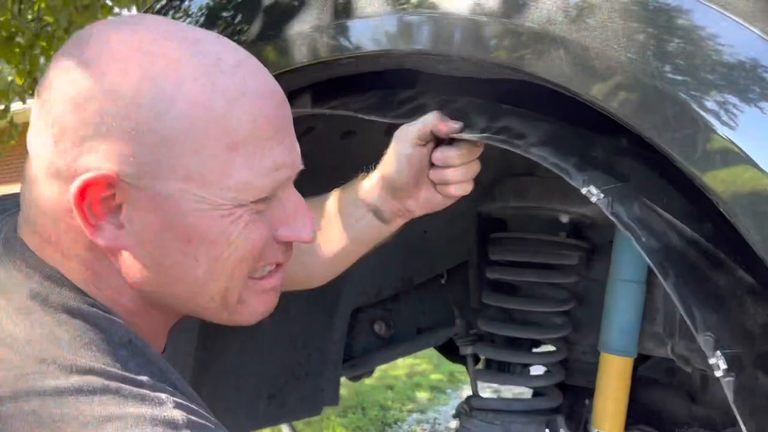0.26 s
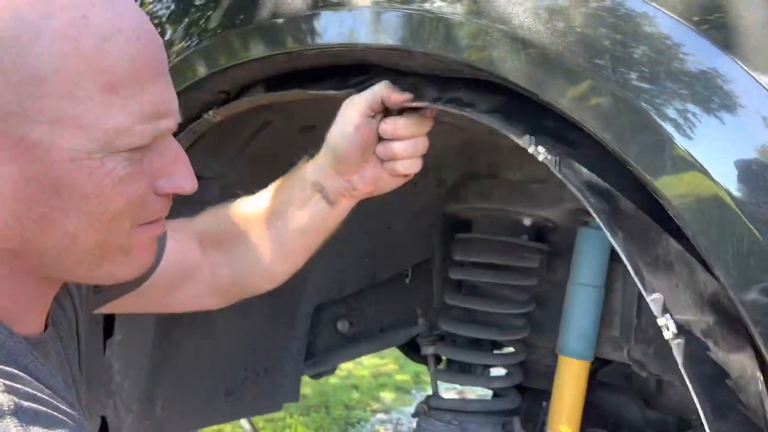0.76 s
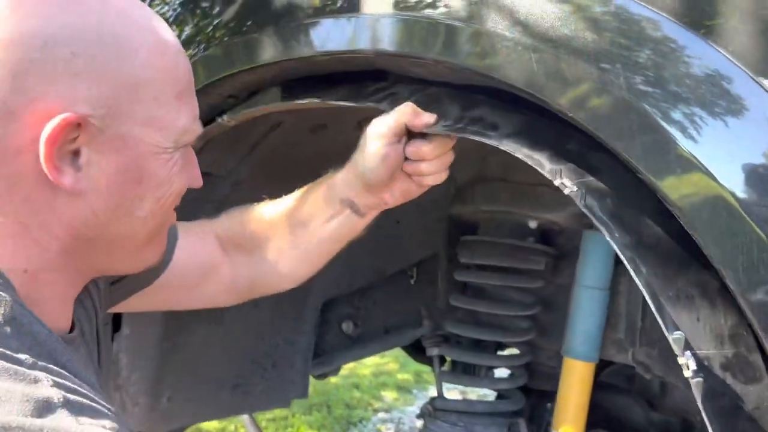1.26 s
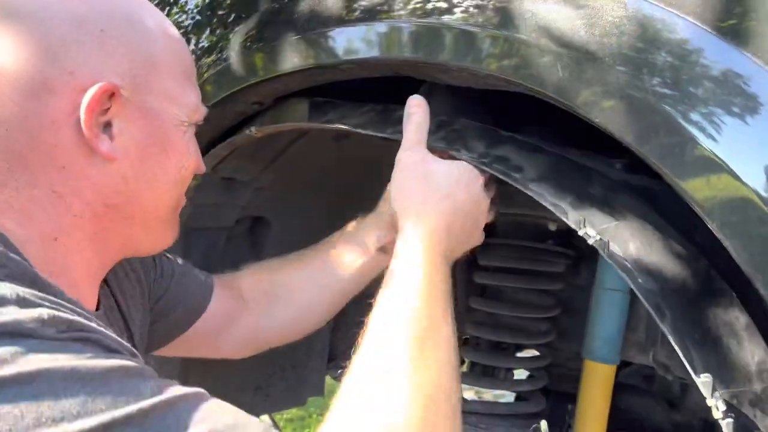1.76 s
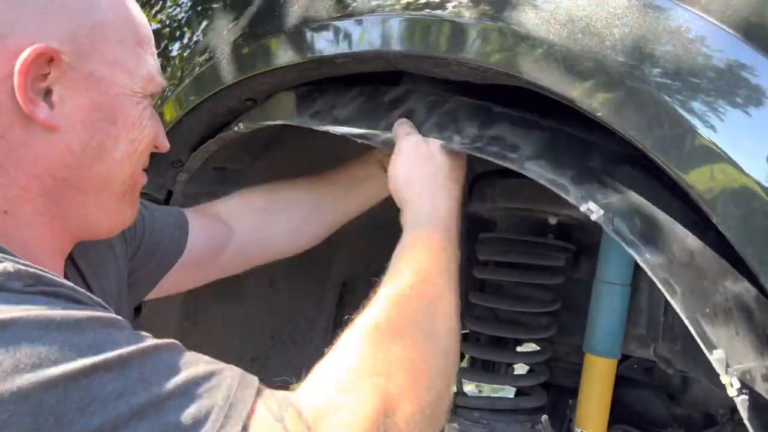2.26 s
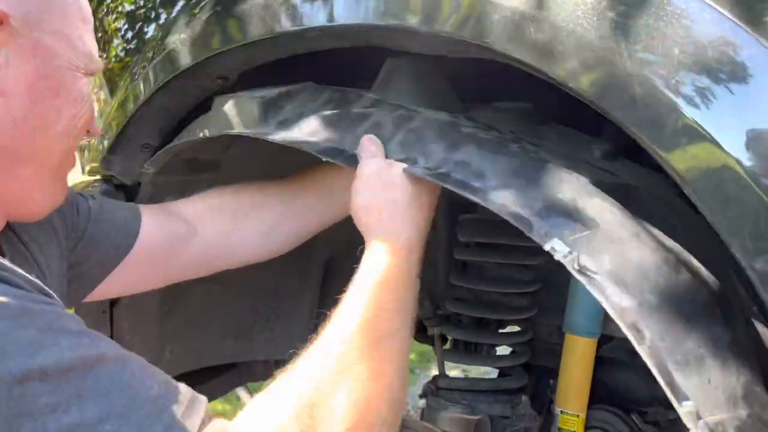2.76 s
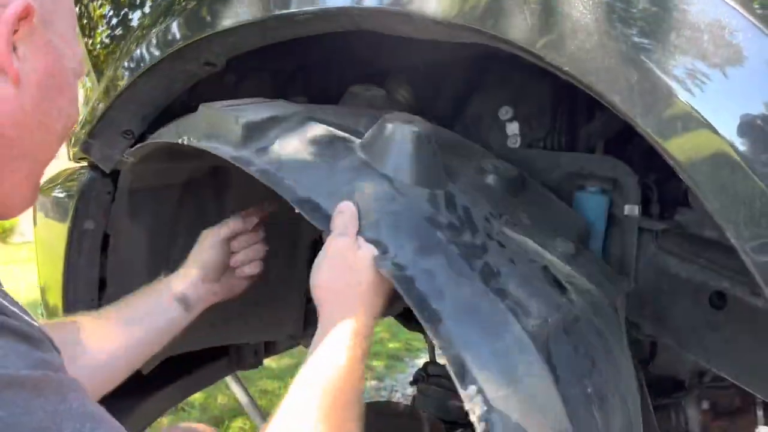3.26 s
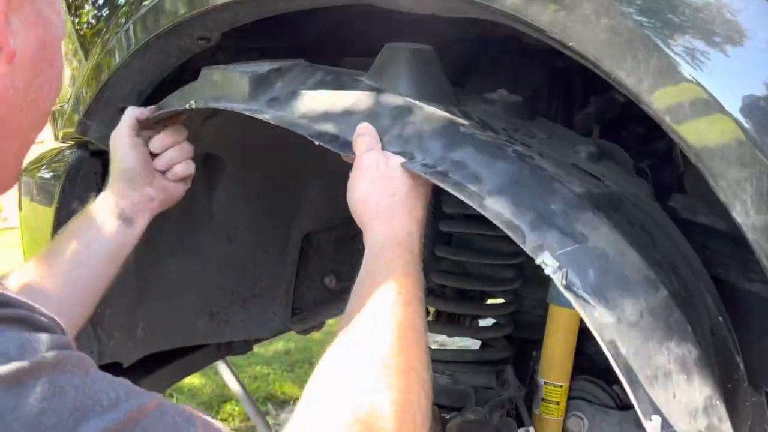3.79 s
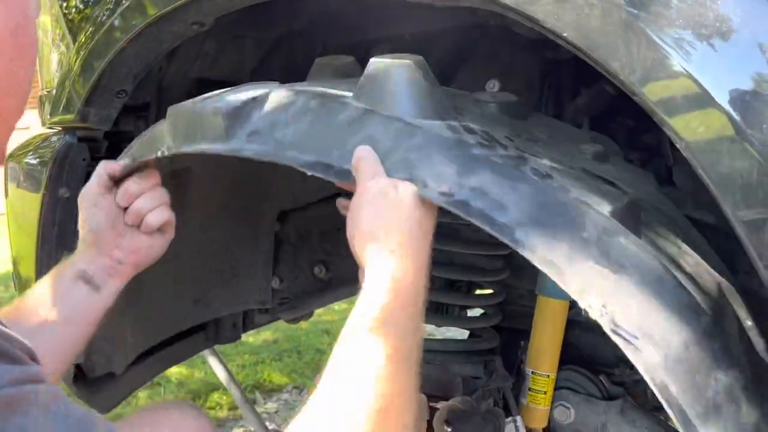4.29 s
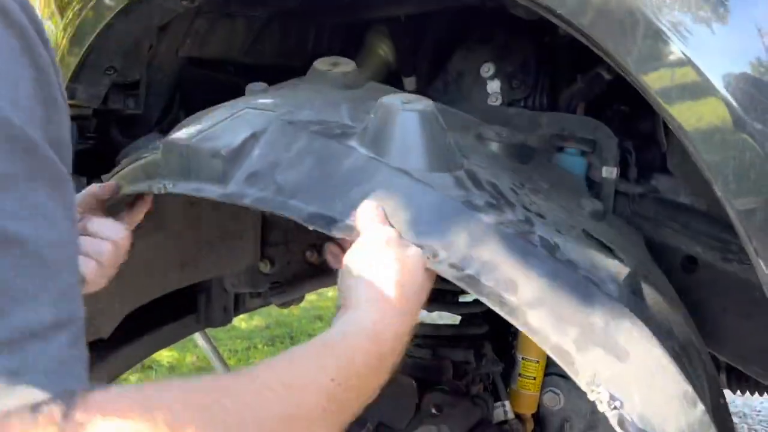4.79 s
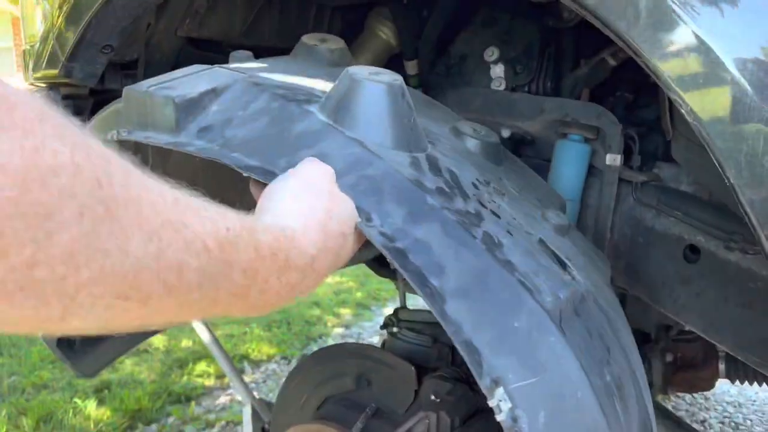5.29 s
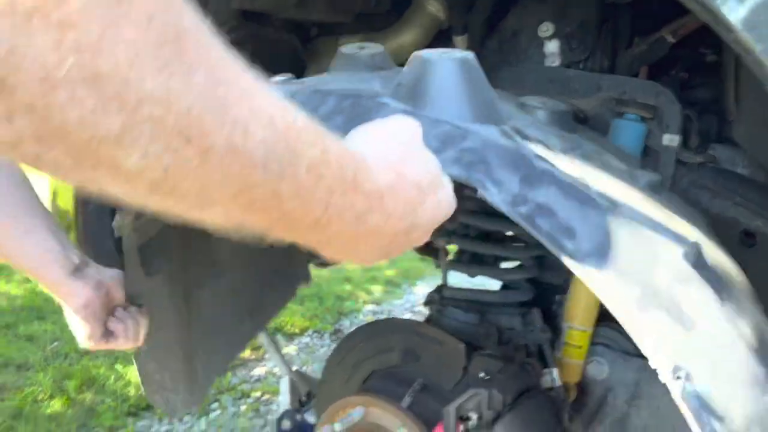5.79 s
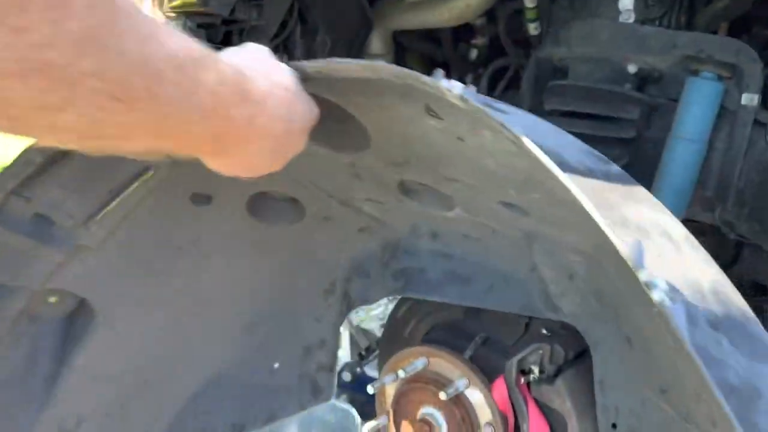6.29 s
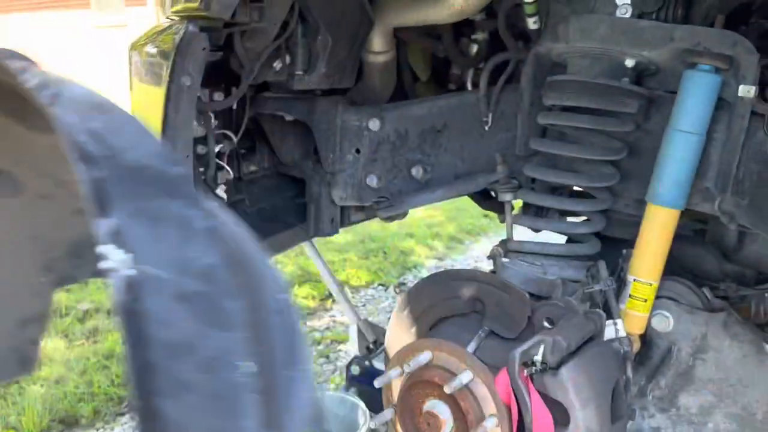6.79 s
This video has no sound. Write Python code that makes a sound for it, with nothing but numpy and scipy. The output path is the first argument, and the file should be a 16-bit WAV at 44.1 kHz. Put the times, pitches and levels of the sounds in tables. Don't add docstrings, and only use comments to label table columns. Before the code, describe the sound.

A stiff plastic wheel-arch liner is wrenched out by hand outdoors: hollow knocks, scuffs and creaky rasps in bursts, with low panel booms.

```python
import sys
import numpy as np
from scipy import signal
from scipy.fft import rfft, irfft, next_fast_len
from scipy.io import wavfile
from scipy.ndimage import uniform_filter1d, map_coordinates

SR = 44100
rng = np.random.default_rng(int(sys.argv[2]) if len(sys.argv) > 2 else 0)


def convert_level_to_amplitude(level_db):
    exponent = np.asarray(level_db, float) / 20
    return 10 ** exponent


def master(y):
    cut = np.clip(np.atleast_2d(y).T, -1, 1)
    pcm = np.round(cut * 32767)
    wavfile.write(sys.argv[1], SR, pcm.astype(np.int16))


N = 310905


def unit(x):
    return x / np.sqrt(np.mean(x ** 2) + 1e-20)


def along(points, hz):
    f, v = np.transpose(points)
    return np.interp(np.log(hz + 1), np.log(f + 1), v)


def level_line(rows):
    s, db = np.transpose(rows)
    return np.interp(np.arange(N) / SR, s, db)


def wobble(rate):
    knots = rng.standard_normal(int(N * rate / SR) + 4)
    return map_coordinates(knots, [np.arange(N) * rate / SR])


def slowly(law):
    t = np.arange(0, N / SR + .01, .005)
    return np.interp(np.arange(N) / SR, t, law(t))


def filtered(x, response):
    m = next_fast_len(N + SR // 2)
    return irfft(rfft(x, m) * response(np.fft.rfftfreq(m, 1 / SR)), m)[..., :N]


def rush(spectrum, alike):
    def share(hz):
        angle = np.arccos(np.clip(along(alike, hz), -1, 1)) / 2
        return convert_level_to_amplitude(along(spectrum, hz)) * [np.cos(angle), np.sin(angle)]

    mid, side = filtered(rng.standard_normal((2, N)), share)
    return unit(np.array([mid + side, mid - side]))


def resonance(hz, centre, width):
    return 1j * hz * width / (centre ** 2 - hz ** 2 + 1j * hz * width)


# pitch_hz, width_hz, level_db
RIBS = [(636, 57, -15), (675, 36, -1), (1024, 68, -0.5), (1416, 78, 1), (1799, 37.34, 3.5),
        (2247, 169.7, 0.5), (2500, 32.94, -13), (3880, 25, -25.5)]


def ribs(hz):
    centre, width, db = np.transpose(RIBS)[:, :, None]
    detune, lift = rng.standard_normal((2, len(RIBS), 1))
    centre = centre * (1 + 0.063 * detune)
    return 1 + np.sum(convert_level_to_amplitude(db + 0.85 * lift) * resonance(hz, centre, width), 0)


# freq_hz, level_db
SHEET = [(40, -4), (100, -5.5), (250, 5.5), (700, -2.5), (1500, -2), (2600, -3), (4000, -3.5), (9000, -9),
         (16000, -17.5)]
# freq_hz, share_of_t60 [ratio]
DAMPING = [(60, 10), (250, 2.47), (800, 0.64), (2500, 1.76), (8000, 1.213)]
# freq_hz, level_db
SPREAD = [(60, -25), (500, -18.5), (1500, -6), (3000, 0), (8000, -11.5)]


def bending(t60, tilt_db, slip=0, paths=22, size=8192):
    hz = np.fft.rfftfreq(size, 1 / SR) + 1
    draw = rng.random((paths, 4))
    distance = .0035 + .5 * t60 * draw[:, :1] ** 1.5
    travel = distance * np.sqrt(500 / np.maximum(hz, 60))
    gain = convert_level_to_amplitude(-60 * travel / (t60 * along(DAMPING, hz))) * (0.82 + draw[:, 1:2])
    phase = 2 * np.pi * hz * (2 * travel + slip * draw[:, 3:])
    wave = gain * np.exp(-1j * phase)
    mid = wave.sum(0)
    side = convert_level_to_amplitude(along(SPREAD, hz)) * ((draw[:, 2] - .5) * np.sqrt(12) @ wave)
    even = np.sqrt(np.abs(uniform_filter1d(np.abs(mid) ** 2, size=40)) + 1e-9)
    colour = convert_level_to_amplitude(tilt_db(hz) - 1.0) * ribs(hz) / even
    fade = np.clip(2 - 2 * np.arange(size) / size, 0, 1) ** 2
    return fade * irfft(colour * np.array([mid + side, mid - side]), size)


def edge_blows(rows, slip, t60):
    out = np.zeros((2, N + SR))
    for s, db, pitch, hardness in rows:
        tilt = [(800, 0.061), (1500, hardness), (2600, hardness - 9.0), (4500, -14 + 1.2 * hardness)]

        def colour(hz):
            hump = 7 * np.exp(-(np.log(hz / pitch) / 0.33) ** 2)
            return along(SHEET, hz) + along(tilt, hz) + hump

        blow = bending(t60, colour, slip)
        start = max(round((s - .0025) * SR), 0)
        out[:, start:][:, :blow.shape[1]] += convert_level_to_amplitude(db + 27.0) * blow
    return out[:, :N]


# start_s, peak_db, pitch_hz,
# hardness_db
KNOCKS = [(0.001, -7.5, 1106, -8), (0.013, -3.5, 670, -1.5), (0.03, -11, 248, -10),
          (0.133, -11.5, 706, -15), (0.181, -27, 238, 0.5), (0.392, -16.5, 520, -26),
          (0.555, -30, 1010, -8), (0.843, -20, 228.8, 6.5), (0.861, -10.5, 276, -24.5),
          (0.933, -12, 372, -11.5), (1.478, -10.5, 195.7, -22), (1.544, -21.5, 340, -6.5),
          (1.694, -27.5, 231, -3), (2.025, -29, 290, -5), (2.084, -19, 1104, -4.5), (2.137, -16, 212, -6),
          (2.168, -2.5, 338.2, -8), (2.219, -5.5, 523.2, -11.5), (2.229, -2, 334.3, -10),
          (2.438, -9.5, 353, -17.5), (2.473, 1.5, 495.5, -15.5), (2.485, -8.5, 412.2, -12),
          (2.604, -19.5, 534.9, -17), (2.717, -4.5, 175, -12.5), (2.773, -4.5, 404, -13),
          (2.789, -9, 379.5, -13), (2.881, -22, 377.4, -4.5), (3.164, -41, 423.4, 13.5),
          (3.474, -21.5, 372, 0), (3.564, -24.5, 316.8, -14),
          (3.894, -18, 912, 1), (3.9, 0, 560, -11), (3.916, -9.5, 169.6, -5), (3.934, -13.5, 305, -11),
            (4.038, -18, 330, -28), (4.061, -12.5, 496, -5), (4.088, -3.5, 328, -12),
            (4.172, -15.5, 810, -4.5), (4.268, -7.5, 396, -21), (4.377, -7, 326, -12.5),
            (4.434, -15.5, 410.4, -6.5), (4.779, -19, 333, -6.5), (4.84, -23, 513, -6.5),
            (4.865, -25, 540, -4.5), (4.956, -21, 776, -10), (5.428, -24, 562.7, -9),
            (5.524, -29, 720, -26), (5.632, -8.5, 870, 0.5), (5.664, -3.5, 330, -4),
            (5.761, -12.5, 394, -5), (5.835, -23.5, 533, -4), (5.894, -8, 930, -5.5), (5.908, 1, 530, -54),
            (6.154, 0, 440, -20.5), (6.174, -2.5, 446, -13.5), (6.195, -9.5, 419.6, -12.5),
            (6.218, -11, 404, -31.5), (6.227, -13.5, 324.6, -16), (6.256, -13, 387, -15),
            (6.692, -36, 900, -14)]


def knocks():
    return edge_blows(KNOCKS, slip=0.003008, t60=0.071)


# start_s,
# length_s, level_db, pitch_hz
RASPS = [(0.0, 0.0037, -19, 1260), (0.042, 0.0152, -47, 2198), (0.089, 0.01413, -39, 1895),
         (0.09, 0.00682, -50, 4242), (0.132, 0.01136, -33, 1510), (0.184, 0.018, -45.5, 3030),
         (0.814, 0.02, -39.5, 900), (0.836, 0.02, -34, 1350), (0.8435, 0.00394, -24, 2430),
         (0.852, 0.01332, -41, 2960), (0.932, 0.00784, -50, 4344), (0.389, 0.021, -25.5, 584),
         (0.93, 0.0065, -28, 1293), (2.014, 0.032, -39.5, 304), (2.102, 0.00667, -34, 1056),
         (2.135, 0.01174, -36, 937.3), (2.166, 0.0095, -26.5, 1970), (2.182, 0.01058, -40, 2150),
         (2.22, 0.016, -26.5, 1590), (2.271, 0.0098, -36, 1670), (2.325, 0.00709, -41.5, 1964),
         (2.5, 0.009, -35.5, 1551), (2.72, 0.00573, -32, 2000), (2.777, 0.0188, -38, 1876),
         (2.789, 0.025, -36.5, 1360), (2.864, 0.0075, -50, 2250), (1.977, 0.138, -59, 6021),
         (1.296, 0.011, -45, 1250), (1.535, 0.012, -50, 2970), (1.688, 0.016, -44.5, 1510),
         (2.086, 0.0077, -38.5, 1820), (2.227, 0.0079, -36, 2166), (0.85, 0.00808, -54, 4910),
         (0.0, 0.0094, -21.5, 8870),
         (3.171, 0.00596, -60, 2500), (3.905, 0.012, -20, 543.2), (3.908, 0.02027, -34, 1940),
              (4.091, 0.02653, -35, 1670), (5.752, 0.01035, -37, 1260), (6.154, 0.0035, -41, 8910),
              (4.057, 0.022, -37, 2465), (4.083, 0.03968, -38, 2206), (4.266, 0.011, -27.5, 1572),
              (4.268, 0.013, -20.5, 773), (4.273, 0.02, -34, 1210), (4.373, 0.0082, -35, 1980),
              (4.431, 0.0067, -31, 2110), (2.47, 0.0063, -16, 890), (2.485, 0.0094, -18.5, 591.2),
              (3.471, 0.018, -34, 890), (4.765, 0.04024, -37.5, 320), (5.418, 0.03226, -44, 696),
              (5.758, 0.0104, -21, 441), (5.616, 0.01246, -42, 2500), (5.628, 0.0098, -20, 2684),
              (5.659, 0.0066, -20, 3880), (5.667, 0.0354, -33.5, 2500), (5.898, 0.015, -30, 1680),
              (6.155, 0.003684, -27, 1540), (6.172, 0.0173, -37, 1737), (6.173, 0.0058, -34.5, 2430),
              (6.184, 0.014, -39, 2404), (6.185, 0.013, -30, 1697), (6.221, 0.00418, -38, 1402),
              (6.222, 0.007, -40.5, 1877), (6.246, 0.018, -39, 1840), (6.255, 0.012, -52.5, 3154)]


def rasps(size=4096):
    out = np.zeros((2, N + SR))
    t, hz = np.arange(size) / SR, np.fft.rfftfreq(size, 1 / SR)
    for s, length, db, pitch in RASPS:
        draw = rng.random((3, size))
        stroke = np.sqrt(np.sin(np.pi * np.clip((t + 1 / SR) / length, 0, 1)).clip(0))
        slips_per_s = max(1100, 4 / length)
        slips = (draw[0] < slips_per_s / SR) * stroke * convert_level_to_amplitude(5.4 * draw[1])
        stray = convert_level_to_amplitude(-2.5 + along(SPREAD, pitch)) * np.sqrt(12) * (draw[2] - .5)
        pair = slips * [np.ones(size), stray]
        panel = resonance(hz, pitch, pitch / 3.04) ** 2
        mid, side = irfft(rfft(pair) * panel, size)
        loud = np.sqrt(np.sum(mid ** 2) / (SR * (length + 0.00097))) + 1e-9
        out[:, round(s * SR):][:, :size] += convert_level_to_amplitude(db) / loud * np.array([mid + side, mid - side])
    return out[:, :N]


# time_s, level_db
DRAG = [(0.0, -25.5), (0.16, -36), (0.41, -54.5), (0.88, -46), (1.79, -63), (2.06, -54.5), (2.24, -39.5),
        (2.66, -39), (2.75, -33.5), (3.0, -46.5), (3.45, -42.5), (3.83, -53.5), (4.15, -37.5), (4.55, -49),
        (5.03, -45), (5.48, -64.5), (5.83, -58), (6.25, -36.5), (6.3, -69.5)]


def drag(spots=6):
    def colour(hz):
        return along([(80, -4.5), (220, 2.5), (450, -6), (1100, -16.5), (2600, -27.5),
                      (5000, -27.0), (16000, -32.0)], hz)

    rub = np.zeros((2, N))
    for _ in range(spots):
        catches = (rng.random((1, N)) < 300 / SR) * convert_level_to_amplitude(8.6 * rng.random(N) + 4.2 * wobble(30))
        rub += signal.oaconvolve(catches, bending(0.046, colour, slip=.008), axes=1)[:, :N]
    return convert_level_to_amplitude(level_line(DRAG)) * unit(rub)


# peak_s, peak_db, fall_20db_s (its size counts)
HEAVES = [(0.0, -24, 0.22), (0.37, -32.5, 0.57), (0.6, -38, 2.5), (0.72, -47, 0.17), (0.873, -13.5, -0.01),
          (1.12, -36.5, -2), (1.25, -43, 0.15), (1.49, -44.5, 1.6), (2.17, -28, 0.4947), (2.258, -18, 0.12),
          (2.36, -29.5, 0.46), (2.5, -22, 0.06), (2.73, -22.5, 0.14), (2.8, -31.5, 0.18), (3.3, -33.5, 0.3),
          (3.929, -19, 0.23), (3.96, -37.5, 0.2958), (4.1, -22.5, 0.2108), (4.291, -17, 0.06),
          (4.4, -35, 0.5), (4.79, -28.5, -0.44), (4.96, -43.5, 3.5), (5.25, -38, 0.22), (5.46, -42, 0.7),
          (5.68, -36, 0.5), (5.77, -42, 4), (5.924, -16.5, 0.02), (6.165, -30, 0.3), (6.259, -26, 0.19),
          (7.01, -40, 2.7)]
# time_s, level_db
SWAY = [(0, -48.5), (1.4, -51.5), (1.9, -57), (2.6, -49.5), (3.6, -46.5), (4.7, -52), (5.3, -56),
        (5.6, -60), (6.1, -31), (6.4, -66), (6.7, -72), (7.05, -49.5)]
# freq_hz, level_db per Hz
BOOM = [(15, -36.5), (25, -20), (40, -1), (56, 3), (85, -1.5), (115, -5.5), (160, -11.5), (300, -120)]


def boom():
    s, db, fall = np.transpose(HEAVES)[:, :, None]

    def heave(t):
        away = np.maximum(t - s, (s - t) / 0.15)
        return convert_level_to_amplitude(np.max(db - 20 * away / np.abs(fall), 0))

    force = convert_level_to_amplitude(level_line(SWAY) + 3.3 * wobble(4.85)) + slowly(heave)
    low = rush(BOOM, [(60, 0.987)])
    swell = np.sqrt(np.abs(uniform_filter1d(np.mean(low ** 2, 0), size=1500)) + 0.12)
    return convert_level_to_amplitude(-5.0) * force * unit(low / swell)


# start_s, depth_db
DUCKS = [
    (0.06, 7.5),
    (2.49, 12),
    (3.91, 4),
    (5.91, 5.5),
]


def ducking():
    s, db = np.transpose(DUCKS)[:, :, None]
    attack_s, release_s = 0.025, 0.34

    def gain(t):
        since = np.maximum(t - s, 0)
        dip = (1 - np.exp(-since / attack_s)) * np.exp(-(since / release_s) ** 2)
        return convert_level_to_amplitude(-np.sum(db * dip, 0))

    return slowly(gain)


# start_s, pitch_hz, level_db, t60_s
STEEL = [
    (0, 748.3, -55, 4),
    (0, 829, -51, 4),
    (.18, 1572, -60, 1.5),
    (.18, 1868, -47, .4),
    (.18, 2525, -54, .4),
    (.18, 3478, -53, .4),
    (5.912, 296.1, -42, 2.6),
    (5.912, 205, -37, 1.1),
    (5.912, 113, -30, .25),
]


def steel():
    t = np.arange(N) / SR
    tones = np.zeros(N)
    for s, hz, db, t60 in STEEL:
        tones += (t > s) * convert_level_to_amplitude(db - 60 * (t - s) / t60) * np.sin(2 * np.pi * hz * t)
    return convert_level_to_amplitude(4.5) * ducking() * tones


# freq_hz, level_db per Hz
YARD = [(18, -21.5), (30, -8.5), (70, 0.5), (130, -7), (233, -11), (584, -17), (721, -14.5), (1220, -17.5),
        (3200, -24), (5600, -23.5), (7400, -26), (9220, -27), (10200, -41.5), (11300, -34), (13500, -59),
        (15200, -36.5), (16200, -39.5)]
# freq_hz, likeness [-1 to 1]
ALIKE = [(60, 0.912), (180, 0.82), (550, 0.35), (1650, -0.166), (4970, 0.21), (15000, -0.26)]


def yard():
    air = rush(YARD, ALIKE)
    treble = filtered(air, lambda hz: (hz > 4000) & (hz < 9000))
    hiss_db = -56.5 + 1.3 * wobble(14)
    return ducking() * convert_level_to_amplitude(hiss_db) * air / np.std(treble)


# start_s, peak_db
SPRAYS = [(0.001, -15), (2.23, -27), (2.473, -53.5), (2.71, -32), (2.787, -30.5), (3.898, -21),
          (4.174, -35), (4.962, -46), (5.158, -57.5), (5.427, -33), (5.447, -37), (5.485, -40.5),
          (5.63, -19.5), (5.667, -25), (5.834, -33), (5.901, -25), (6.815, -41.5)]


def sprays():
    def colour(hz):
        return along(SHEET, hz) + along([(1000, -23.0), (2600, 1.5), (4500, 0.58), (9000, 5.0)], hz)

    out = np.zeros((2, N + SR))
    for s, db in SPRAYS:
        blow = bending(.06, colour, slip=0.0055)
        out[:, round(s * SR):][:, :blow.shape[1]] += convert_level_to_amplitude(db + 28.0) * blow
    return out[:, :N]


# start_s, peak_db, pitch_hz
GRIT = [(0.0024, -6, 2850), (0.8442, -46.5, 2388), (0.932, -32.5, 3010), (2.168, -17.5, 2615),
        (2.473, -22.5, 2851), (2.709, -22.5, 6350), (2.788, -23, 7100), (2.8846, -30.5, 2752),
        (3.898, -7.5, 3880), (4.062, -23, 2440), (4.174, -26.5, 8450), (4.377, -34, 3236),
        (4.8666, -31, 8424), (4.9008, -30.5, 8793), (4.9257, -30, 6488), (4.9597, -20, 7100),
        (5.106, -34.5, 3873), (5.1559, -26.5, 9900), (5.231, -32.5, 8737), (5.2592, -37, 6940),
        (5.3, -18.5, 7500), (5.321, -26, 6056), (5.3443, -24.5, 5726), (5.3994, -29.5, 9200),
        (5.6312, -20, 2746), (5.665, -34, 4150), (5.8377, -23, 3100), (5.906, -12.5, 3100),
        (6.302, -33, 3935), (6.8177, -30.5, 8500)]


def grit():
    out, t = np.zeros(N + SR), np.arange(900) / SR
    for s, db, pitch in GRIT:
        rough = 1 + 0.037 * rng.standard_normal(len(t))
        ring = 0.435 * np.sin(2 * np.pi * pitch * t) * convert_level_to_amplitude(-60 * t * pitch / 36) * rough
        click = .5 * np.diff(rng.standard_normal(len(t) + 1)) * convert_level_to_amplitude(-60 * t / 0.02)
        out[round(s * SR):][:len(t)] += convert_level_to_amplitude(db + 2.0) * (ring + click)
    return out[:N]


# freq_hz, t60_s
ARCH = [(200, 0.11), (2000, 0.1533), (10000, 0.074)]


def arch(x, size=8192):
    out = np.zeros((2, N + SR))
    for i in range(0, N, size):
        hz, t, z = signal.stft(rng.standard_normal((2, SR // 4)), SR, nperseg=256)
        alike = np.clip(along([(300, 1.0), (3000, 0.255)], hz), 0, 1)[:, None]
        z = np.array([z[0], alike * z[0] + np.sqrt(1 - alike ** 2) * z[1]])
        decay = convert_level_to_amplitude(-60 * t / along(ARCH, hz)[:, None])
        tail = signal.istft(z * decay, SR, nperseg=256)[1]
        echo = signal.fftconvolve(x[:, i:i + size], tail / np.linalg.norm(tail[0]), axes=1)
        out[:, i:][:, :echo.shape[1]] += echo
    return out[:, :N]


# start_s, peak_db, pitch_hz, hardness_db
SCUFFS = [(0.049, -16, 565, -22.5), (0.089, -16.5, 430, -1.5), (0.355, -25.5, 172.2, -11.5),
          (0.373, -26, 469, -5), (0.404, -15, 459.6, -12), (0.419, -13, 433.8, -21),
          (0.439, -22, 320, -45.5), (0.829, -9.5, 220, -8.5), (1.19, -24.5, 185.3, -11),
          (1.221, -22.5, 220.6, -11.5), (1.51, -27, 221.7, -6), (2.103, -17, 295, -10),
          (2.148, -12, 203.1, -18.5), (2.189, -6.5, 348, -11.5), (2.249, -15, 322.6, -39),
          (2.274, -13, 184, -12), (2.409, -18, 204.3, -14), (2.509, -13, 243.2, -16),
          (2.819, -22, 399.1, -36.5), (3.245, -20.5, 189, -4.5), (3.284, -21, 377.5, -12),
          (3.309, -19.5, 201, -16), (3.592, -25, 311.1, -9), (4.119, -14.5, 289, -13),
          (4.288, -14, 308, -16.5), (4.399, -20.5, 347.2, -33.5), (4.468, -24.5, 303.1, -34),
          (4.798, -27.5, 274, -32.5), (5.449, -25, 257, -8), (5.699, -13, 341.3, -9)]
# start_s, peak_db, pitch_hz
QUIET_SCUFFS = [(0.666, -32.5, 318), (1.093, -39, 317.5), (1.297, -34.5, 1205), (1.341, -35, 961.7),
                (1.658, -30, 302), (1.869, -52, 196), (2.325, -23.5, 174), (2.552, -58, 253),
                (2.648, -27.5, 332.3), (3.219, -28.5, 271.6), (3.348, -35, 172), (3.821, -27.5, 241.5),
                (4.526, -33.5, 306), (4.61, -31, 325), (4.99, -30, 423), (5.069, -33.5, 733.7),
                (5.156, -35, 694.7), (5.204, -38.5, 997), (5.37, -41.5, 182.6), (5.486, -31, 365.1),
                (6.108, -35.5, 299.1), (6.816, -31.5, 167), (6.989, -38, 850)]


def slides():
    quiet = [(*row, -8) for row in QUIET_SCUFFS]
    return edge_blows(SCUFFS + quiet, slip=.016, t60=.06)


# start_s, peak_db, pitch_hz
SNAPS = [(0.097, -35, 2980), (.11, -40.5, 3300), (.14, -26, 1484), (.377, -40, 2014), (.421, -39, 2600),
         (0.8444, -20, 2751), (0.932, -28.5, 2800), (1.241, -36, 1989), (1.345, -38, 950),
         (1.52, -38.5, 2800), (1.546, -41.5, 3200), (1.626, -38, 3600), (1.694, -43, 3000),
         (2.106, -33, 1200), (2.191, -23.5, 4000), (2.33, -37.5, 3500), (2.365, -36, 1800),
         (2.5, -28, 3500), (2.723, -11, 700), (2.886, -25, 2500), (3.165, -34, 1600), (3.219, -32.5, 950),
         (3.247, -36, 3000), (3.477, -31, 2162), (3.587, -26.5, 1100), (4.091, -7.5, 760),
         (4.27, -12.5, 850), (4.376, -22, 2550), (4.434, -31, 2200), (5.263, -39.5, 1100),
         (5.374, -39.5, 1000), (5.636, -15, 510), (5.64, -24, 1100), (5.677, -15, 410), (5.764, -20, 1406),
         (5.769, -11.5, 444), (6.155, -5, 696), (6.175, -15.5, 580), (6.195, -26, 2269), (6.0, -46, 3000),
         (6.2, -18, 540), (6.218, -32, 1100), (6.228, -30, 1562), (6.263, -17.5, 500)]


def snaps(size=2048):
    out, hz = np.zeros((2, N + SR)), np.fft.rfftfreq(size, 1 / SR) + 1
    travel_s, lead_in_s = .003, .003

    def path(travel):
        return np.exp(-4j * np.pi * travel * np.sqrt(500 * hz) - 2j * np.pi * hz * lead_in_s)

    first = path(travel_s)
    second = convert_level_to_amplitude(-11.5) * path(travel_s + 0.00314)
    side = convert_level_to_amplitude(-3.5) * second
    for s, db, pitch in SNAPS:
        band = np.exp(-.5 * (np.log2(hz / pitch) / 0.59) ** 2)
        pulse = irfft(band * np.array([first + second + side, first + second - side]), size)
        start = s - lead_in_s - travel_s * np.sqrt(500 / pitch)
        out[:, round(start * SR):][:, :size] += convert_level_to_amplitude(db) * pulse / np.abs(pulse).max()
    return out[:, :N]


# freq_hz, level_db
NEAR_COLOUR = [(30, -17), (60, 3.5), (9000, -2.5), (10200, -5.5), (11300, -2.5), (13900, -29), (15300, -6),
               (16300, -55.5)]
# freq_hz, level_db
LEFT = [(60, 1), (150, 3), (380, 2), (950, 1.5), (2380, -2.5), (5980, 11), (15000, -6.5)]
# freq_hz, phase_rad
LEAD = [(1200, -.1), (5600, .9), (8300, .4), (10900, -3.7), (13300, -8.5), (16600, -12.7)]


def ports(near):
    def response(hz):
        tilt = convert_level_to_amplitude(along(LEFT, hz) / 2) * np.exp(.5j * along(LEAD, hz))
        return convert_level_to_amplitude(along(NEAR_COLOUR, hz)) * tilt ** np.array([[1], [-1]])

    return filtered(near, response)


def scene():
    near = knocks() + slides() + sprays() + grit() + drag() + boom()
    near = near + convert_level_to_amplitude(-7.5) * arch(near) + steel()
    near = near + rasps() + snaps()
    return ports(near) + yard()


def band_limit(x):
    return signal.sosfilt(signal.butter(12, 17010, fs=SR, output="sos"), x)


def record(dry):
    soft = dry / (1 + np.abs(dry / .97) ** 8) ** (1 / 8)
    mix = filtered(soft, lambda hz: hz < 16300)
    return band_limit(mix)


dry = scene()
out = record(dry)
master(out)
```